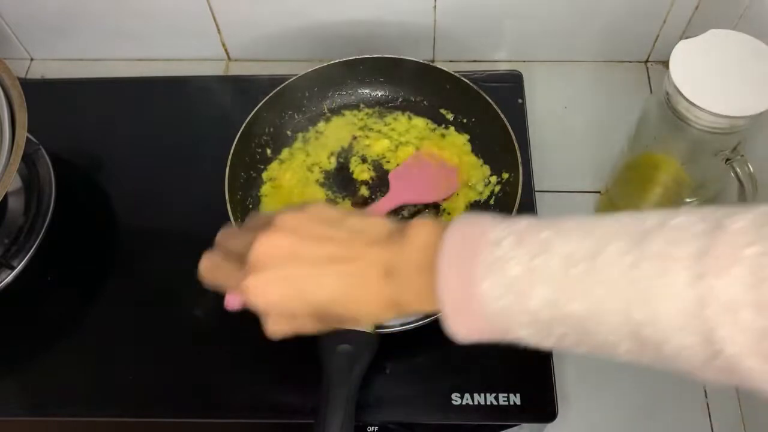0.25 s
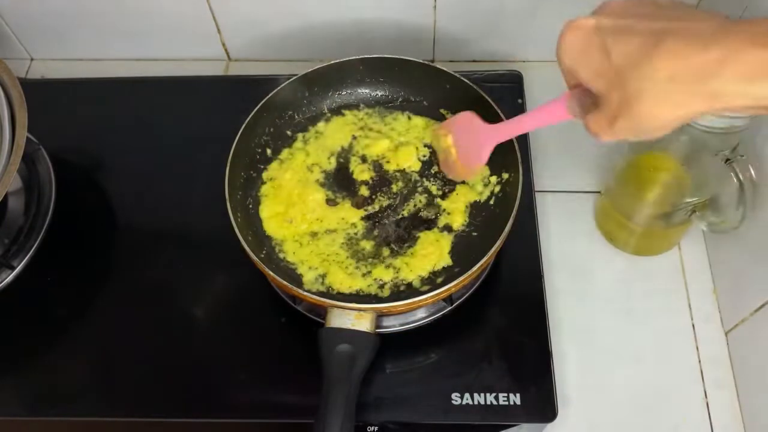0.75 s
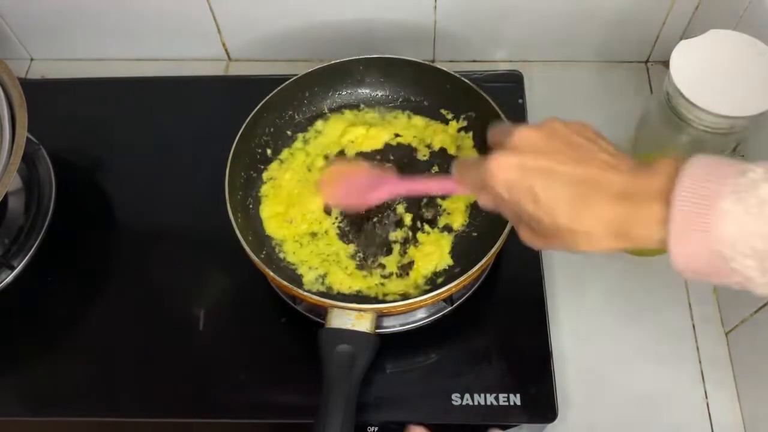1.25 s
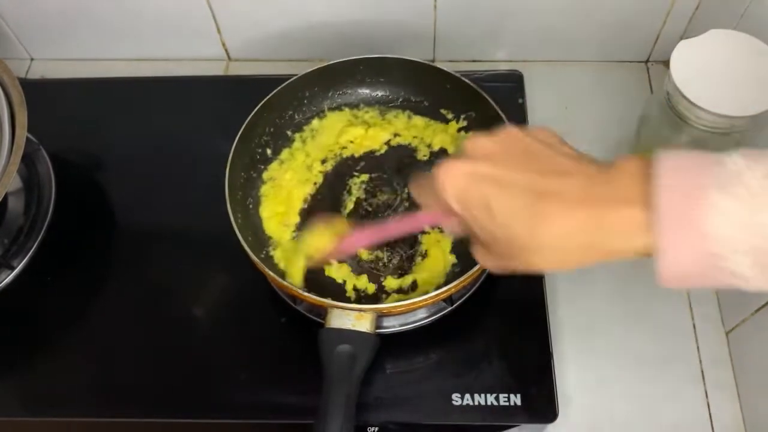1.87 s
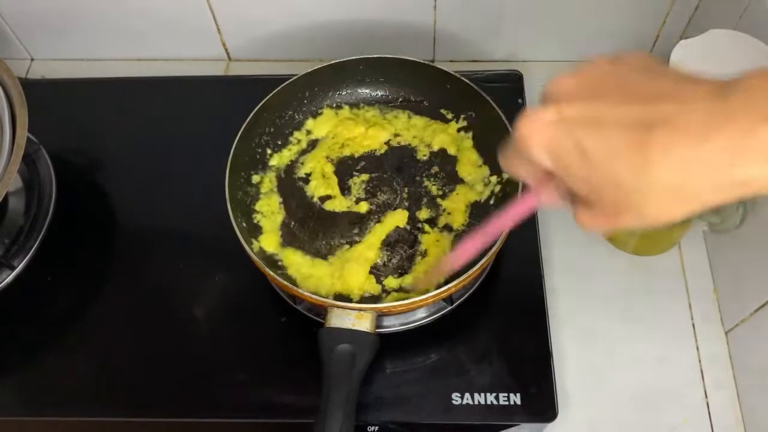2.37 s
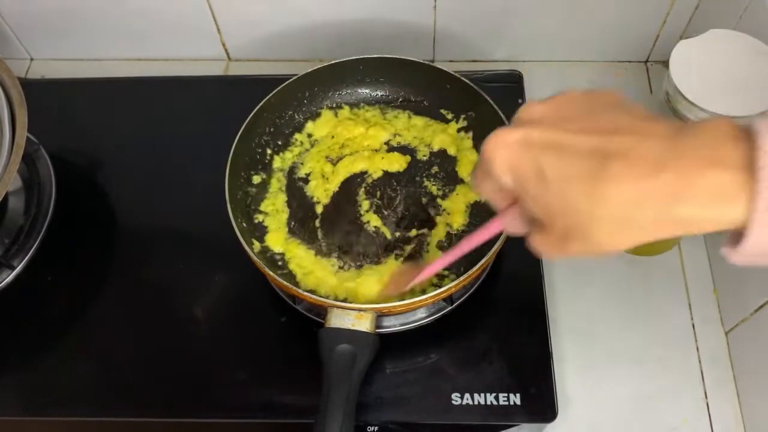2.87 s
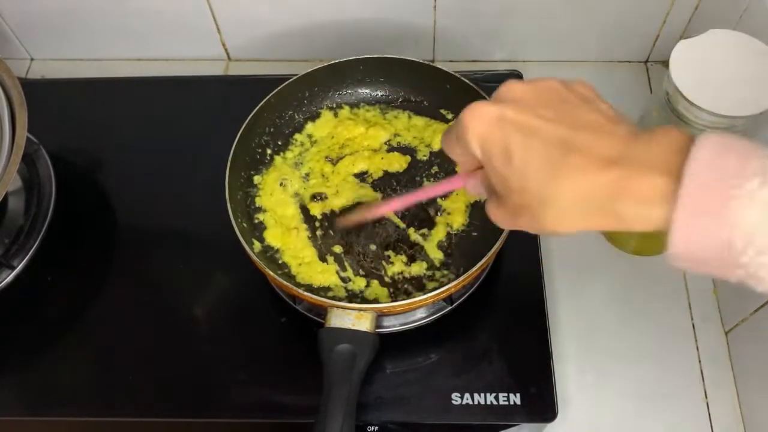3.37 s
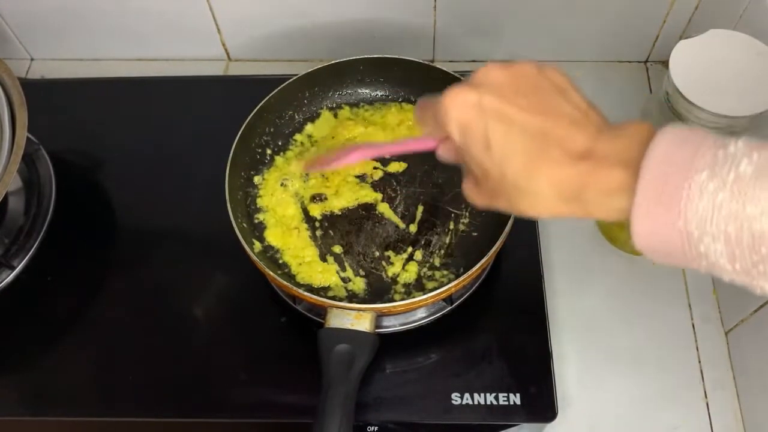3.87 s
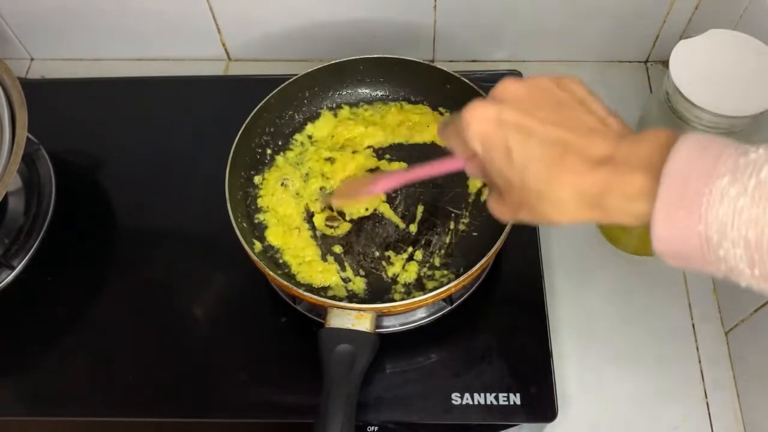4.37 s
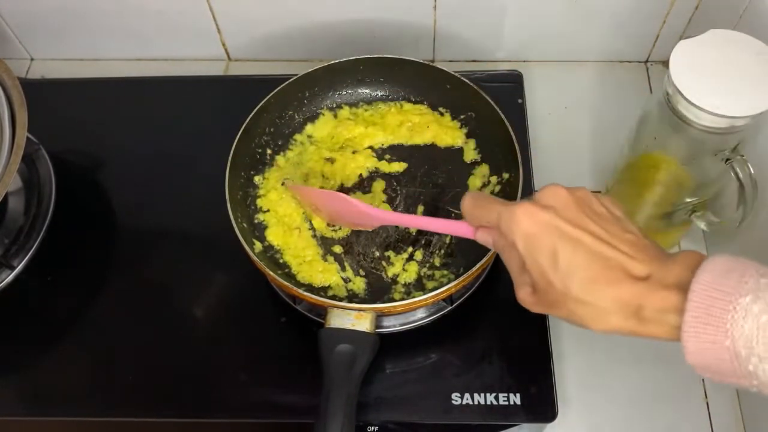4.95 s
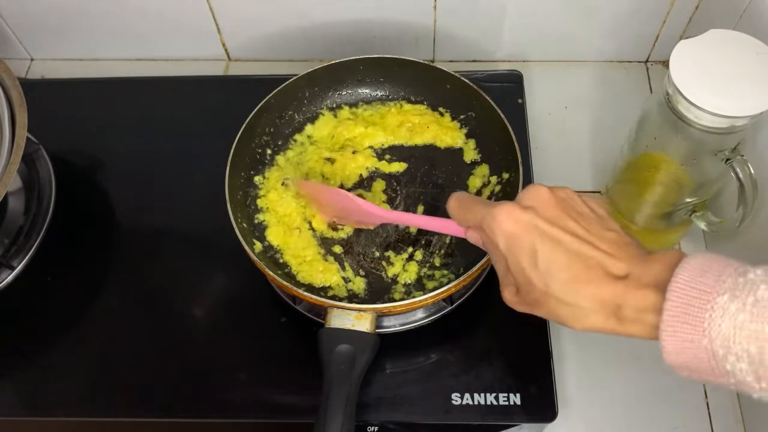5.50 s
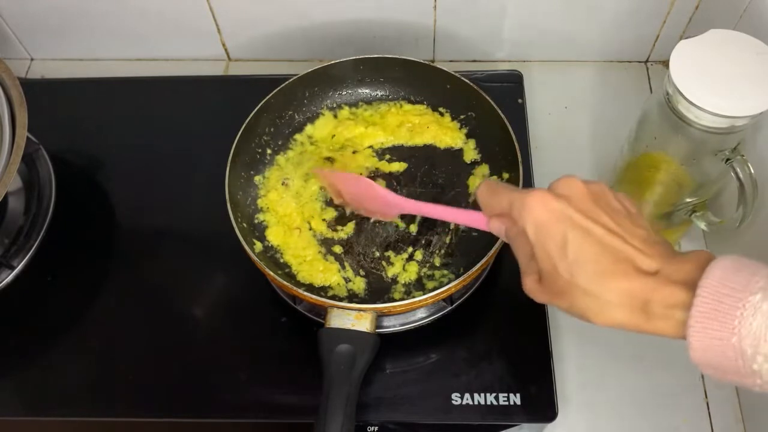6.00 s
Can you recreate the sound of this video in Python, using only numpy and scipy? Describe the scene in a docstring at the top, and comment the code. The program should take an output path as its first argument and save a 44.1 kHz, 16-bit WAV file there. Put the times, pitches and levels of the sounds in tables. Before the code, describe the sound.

Close stereo microphone over a hot pan in a home kitchen: continuous hissing, fizzing fry noise, wetter and louder whenever paste is pressed against the metal. One dull knock opens, a sharper clack with quick thuds comes after two seconds, a low windy thump around three, then scattered soft thuds near the end. Tiny rubbery squeaks, faint scraping murmur, a far motor that fades and a quiet low hum sit underneath.

```python
"""Sizzling spice paste

Wet spice paste sizzles in a pan: noise and tiny bubble pings, louder where paste is pressed on hot metal.
A soft spatula makes dull knocks by ringing the pan's tones, murmurs by rubbing and hoots in short squeaks.
Air twice buffets the microphone: low noise with a moving upper edge, plus single flaps.
Behind it are a fan's wavering tones, a far motor that fades, a low drone and soft kitchen noise."""
import sys
import numpy as np
from scipy import signal
from scipy.fft import rfft, irfft
from scipy.io import wavfile
from scipy.ndimage import uniform_filter1d

SR = 44100
rng = np.random.default_rng(int(sys.argv[2]) if len(sys.argv) > 2 else 0)


def log_audio(samples):
    """Write samples as a 16-bit WAV file to the path given in sys.argv[1]."""
    # one column per channel
    frames = np.atleast_2d(samples).T
    # limit to full scale, then quantise
    limited = np.clip(frames, -1, 1)
    pcm = np.round(limited * 32767).astype(np.int16)
    wavfile.write(sys.argv[1], SR, pcm)


N = 274743
TIME = np.arange(N) / SR
BINS = np.fft.rfftfreq(N, 1 / SR)

# Frying layers: fine fizz is full above the first pitch, wet hiss between the next two,
# coarse bubbling below the last; they blend in between: f/Hz
FRYING_EDGES = [9900, 5260, 3100, 1650]
# Tone colour of the sizzle, before the pan's ringing: f/Hz, relative level/dB
SIZZLE_COLOUR = [(400, -30.5), (800, -18.5), (980, -8.5), (1200, -9.5), (1420, -4), (1850, -7.5),
                 (2500, -7), (3700, -2), (5000, -3), (6500, -0.5), (7500, -5), (8200, -1.5), (9500, .5),
                 (12000, -1), (15500, -3)]
SIZZLE_DB = -30.5
# Faint ringing of the pan under the bubbles: f/Hz, width/Hz, boost/dB
PAN_RING = [(976, 13, 6.5), (1078, 97, 3.5), (1370, 38, 3.5), (1509, 32, 4.5), (1977, 22, 2.5),
            (2075, 23, 7), (3160, 13, 7.5), (3490, 34, 5), (3820, 69, 4.5), (5630, 220, 2), (6000, 93, 1)]
# Slow level of the fine fizz: t/s, relative level/dB
FIZZ_LEVEL = [(0, -3.5), (.2, -3.5), (.42, -1.5), (.8, -1), (1.35, .3), (2.05, -2.5), (2.35, 0.5),
              (3.3, -2), (4.8, 1.17), (6.23, 1)]
# The spatula presses wet paste onto hot metal: start t/s, length/s, rise of the wet hiss/dB
PRESSES = [(0.747, 0.45, 3), (1.157, 0.082, 4.5), (1.242, 0.34, 3), (2.206, 0.34, 3.5), (2.554, 0.724, 2.5),
           (3.294, 0.95, 6.5), (4.373, 2.1, 3)]
PRESS_ATTACK_S, PRESS_RELEASE_S = 0.041, 0.044
IDLE_HISS_DB = -4.5  # the wet hiss while nothing is pressed
BUBBLING_DB, BUBBLING_SHARE = -0.34, 0.39  # coarse bubbling follows the wet hiss by this share
# Pockets of steam escape in a flare of fine fizz: t/s, rise/dB
FLARES = [(.93, 3), (1.23, 2.5), (3.13, 4), (3.98, 1.5), (6.169, 2.5)]
FLARE_RISE_S, FLARE_FALL_S = 0.038, 0.055

# Ringing tones of the loaded pan on its support: f/Hz, relative level/dB, time to fall 60 dB/s
PAN_MODES = [(123, 10, 0.18), (142, 7, 0.084), (230.5, 1, 0.13), (272, -1.5, 0.08), (292.5, 4.5, 0.089),
             (338, 0.5, 0.029), (427, -5, 0.073), (512, -7, 0.095), (567.7, 0, 0.1), (706, -9, 0.024),
             (760, -7, 0.027), (951, -1.5, 0.057), (1030, -8, 0.05), (1150, -14, 0.046), (1430, -3, 0.041),
             (1550, -5, 0.036), (2190, -3, 0.056)]
# The spatula taps the pan: t/s, peak level/dB (without room), centre f/Hz, width/octaves, ring time factor
TAPS = [(0, -27, 241, 0.038, 1.2), (.002, -37.5, 433, .11, 0.88), (2.274, -22.5, 1290, 0.48, 0.81),
        (2.275, -30.5, 410, 0.14, 0.88), (2.281, -22.5, 955, 0.14, 0.94), (2.284, -29.5, 570, 0.23, 0.86),
        (4.564, -40.5, 514, 0.26, 0.6), (4.814, -38, 538, 0.41, 0.96), (5.794, -38, 530, 0.27, .9),
        (6.066, -35, 530, .22, 0.73)]
# The pan rocks on its support with dull thuds: t/s, peak level/dB (without room), centre f/Hz
THUDS = [(2.286, -20.5, 259), (2.309, -28, 278), (2.339, -40, 250), (2.362, -29.5, 332), (2.388, -45, 330),
         (4.596, -41, 300), (4.63, -45, 280), (4.826, -26.5, 287), (4.853, -27.5, 293), (4.87, -31.5, 300),
         (5.136, -38, 288), (5.167, -29.5, 285), (5.379, -39, 316), (5.412, -32, 281), (5.806, -35, 233),
         (5.831, -23.5, 283), (5.855, -33.5, 250), (5.873, -34, 300), (5.945, -40, 258), (6.078, -36, 218),
         (6.102, -33.5, 287)]
THUD_OCTAVES, THUD_RING = 0.31, 0.98  # width of a thud's spectrum; its ring time factor
KNOCK_ROOM_DB = -12
# The spatula drags through paste: start t/s, length/s, level/dB
DRAGS = [(0, 3.57, -57.5), (2.24, 0.23, -52.5), (4.534, 1.52, -56.5)]
DRAG_ATTACK_S, DRAG_RELEASE_S = 0.031, 0.29
# The soft blade squeaks on the metal: start t/s, length/s, middle peak level/dB, middle f/Hz
SQUEAKS = [(0.829, .026, -45, 560), (1.14, .05, -50.5, 566), (1.24, .012, -50.5, 610),
           (2.482, 0.013, -40.5, 637), (3.815, 0.026, -41, 572), (5.103, 0.023, -41, 568),
           (5.798, 0.018, -40.5, 562), (6.138, .027, -44.5, 570)]
SQUEAK_ATTACK_S, SQUEAK_RELEASE_S = 0.007, 0.013

# Air blows across the microphone: t/s, rms level/dB, upper edge f/Hz
GUSTS = [(2.0, -73, 80), (2.05, -48, 89), (2.09, -36.5, 62), (2.145, -39, 110), (2.22, -37, 65.4),
         (2.26, -71, 80), (2.9, -72, 80), (2.995, -44, 131), (3.07, -39, 220), (3.09, -29, 290),
         (3.12, -22.5, 260), (3.155, -28, 208), (3.18, -22.5, 270), (3.225, -22.5, 247), (3.25, -28, 110),
         (3.275, -58, 80), (3.3, -75, 80)]
# Tone colour of the moving air, before the upper edge: f/Hz, relative level/dB
GUST_COLOUR = [(25, -45), (40, -2.5), (74, 3), (120, -5.5), (160, 0.5), (210, -10.5), (300, -16),
               (600, -18.5), (1200, -46)]
GUST_EDGE_DB_PER_OCTAVE = 27
# Single eddies flap against the microphone: t/s, level/dB (before a shared boost), centre f/Hz
EDDIES = [(2.144, -41, 230), (3.075, -32.5, 480), (3.124, -23.5, 354), (3.172, -18, 150), (3.185, -17, 268),
          (3.193, -25, 490), (3.218, -28, 385)]
EDDY_CYCLES = 0.79

# Steady tones of the fan: middle f/Hz, rms level/dB
FAN_TONES = [(53.9, -49), (107.8, -66.5)]
# The fan's hum dips briefly: t/s, depth/dB
HUM_DIPS = [(2.428, 34), (4.07, 28), (4.95, 5)]
HUM_DIP_WIDTH_S = 0.17
# A far motor drifts unevenly in pitch, then fades: t/s, f/Hz, middle rms level/dB of its main tone
MOTOR_PATH = [(0, 228.8, -57), (.35, 224, -57.5), (.55, 229, -56.5), (.9, 223.4, -59), (1.25, 216.8, -61.5),
              (1.45, 216.4, -54.5), (1.62, 212.5, -56.5), (1.85, 215.3, -55), (2.05, 213.6, -65),
              (2.7, 219.8, -63), (3.2, 219, -75)]
MOTOR_HALF_DB = -9.5  # its tone an octave below, against the main tone
# A lower drone comes and goes
DRONE_HZ, DRONE_DB = 179, -58.5
DRONE_START_S, DRONE_LENGTH_S, DRONE_ATTACK_S, DRONE_RELEASE_S = 0.56, 0.91, 0.83, 0.24
# Tone colour of the kitchen noise: f/Hz, relative level/dB
ROOM_COLOUR = [(20, -30), (36, -12), (50, -0.5), (72, 2.5), (86, -3.5), (105, 0.5), (150, -13.5),
               (290, -18), (390, -20), (420, -8), (450, -26), (570, -12), (660, -22), (900, -22.5)]
ROOM_DB = -48

# Phase between the microphone's two ports: f/Hz, phase/rad
PORT_PHASE = [(0, 0), (50, -.22), (180, -.65), (350, -.8), (780, -1.4), (1030, -.3), (2700, .7),
              (3790, 1.6), (4700, 3.14), (16000, 19.85)]
# Left port against right port: f/Hz, level/dB
PORT_BALANCE = [(60, .5), (200, 2.5), (560, 3), (760, 0), (1000, -6), (1400, -3), (2600, -2.6), (3900, 0),
                (15000, 0)]
# How alike the two ports hear: f/Hz, likeness (0 to 1)
PORT_LIKENESS = [(100, 1), (400, 1), (750, 0.038), (1100, 1), (2400, 0.62), (4400, 1), (15000, 1)]
RUMBLE_CUT_HZ, EDGE_HZ = 23, 15800  # lower and upper limit of the recorded band


def sizzle(pop_share, patchy_db, sputter_db):
    """Near bubbles pop over a wash of countless others, in clumps that rise and fall with the frying."""
    share = np.clip(pop_share, 0, 1)
    pops = bubbles(per_s=5000, spread_db=1.0, cycles=1.34)
    near = np.sqrt(share) * pops + np.sqrt(1 - share) * rng.standard_normal(N)
    # row 0 is the direct sound, row 1 the diffuse sound
    pair = coloured(np.array([near, rng.standard_normal(N)]), SIZZLE_COLOUR)
    ring_db = sum(boost / (1 + (2 * (BINS - centre) / width) ** 2) for centre, width, boost in PAN_RING)
    pair = irfft(rfft(pair) * gain_of(ring_db), N)

    # shape the level in small tiles of time and pitch
    hz, t, tiles = signal.stft(pair, SR, nperseg=256, noverlap=192)
    layer_shapes = np.eye(3)[:, [0, 1, 1, 2]]  # fizz, hiss, bubbling at the four edges
    pitch, edges = -np.log(hz + 1), -np.log(FRYING_EDGES)
    reach = np.array([np.interp(pitch, edges, shape) for shape in layer_shapes])
    clumps = uniform_filter1d(rng.standard_normal(tiles.shape[1:]), size=12, axis=0)
    clumps = evened(uniform_filter1d(clumps, size=14, axis=1))
    tiles = tiles * gain_of(reach.T @ frying_levels(t) + patchy_db * clumps)
    pair = signal.istft(tiles, SR, nperseg=256, noverlap=192)[1][:, :N]
    pair = pair * gain_of(sputter_db * drift(rate_hz=9.9))
    return gain_of(SIZZLE_DB) * ports(*evened(pair))


def frying_levels(t):
    """Fine fizz, wet hiss and coarse bubbling in dB: pressing raises the last two, escaping steam the first."""
    wet = IDLE_HISS_DB + sum(rise_db * held(t - s, length, PRESS_ATTACK_S, PRESS_RELEASE_S)
                             for s, length, rise_db in PRESSES)
    flares = sum(rise_db * held(t - s, FLARE_RISE_S, FLARE_RISE_S, FLARE_FALL_S) for s, rise_db in FLARES)
    fizz = np.interp(t, *np.transpose(FIZZ_LEVEL)) + flares
    return np.array([fizz, wet, BUBBLING_DB + BUBBLING_SHARE * wet])


def bubbles(per_s, spread_db, cycles, count=24):
    """Each bursting bubble is a fading ping; higher pings, from smaller bubbles, come more often."""
    out = np.zeros(N)
    t = TIME[:400]
    for hz in np.geomspace(1000, 15000, count):
        ping = np.sin(2 * np.pi * hz * t) * np.exp(-t * hz / cycles)
        share = np.sqrt(hz / SR) * 3 / count  # scales the pop rate at this pitch
        strength = gain_of(spread_db * np.minimum(rng.exponential(1, N), 5))
        pops = strength * (rng.random(N) < share * per_s / SR)
        out += np.sqrt(hz) * evened(signal.oaconvolve(pops, ping)[:N])
    return evened(out)


def knocks(rise_cycles, room_db, room_t60):
    """A soft blow rings the pan's tones near its own pitch; the spatula left in contact damps them."""
    out, t = np.zeros(N), TIME[:SR // 2]
    hz, db, t60 = np.transpose(PAN_MODES)[:, :, None]
    for s, peak_db, centre_hz, octaves, ring in blows():
        weight = gain_of(db) / (1 + (np.log2(hz / centre_hz) / octaves) ** 2)
        modes = weight * gain_of(-60 * t / (t60 * ring)) * np.sin(2 * np.pi * hz * t)
        rise = 1 - np.exp(-(t * centre_hz / rise_cycles) ** 2)  # a brighter blow rises faster
        blow = modes.sum(0) * rise
        add(out, s, gain_of(peak_db) * blow / abs(blow).max())
    direct = out + gain_of(room_db) * reverberant(out, room_t60)
    return ports(direct, reverberant(out, room_t60))


def blows():
    """Lists every blow on the pan, from taps and rocking, with the columns of TAPS."""
    return TAPS + [(s, db, hz, THUD_OCTAVES, THUD_RING) for s, db, hz in THUDS]


def rubbing(centre_hz, octaves, uneven_db):
    """Friction under the soft blade keeps the pan's middle tones murmuring."""
    hz, db, t60 = np.transpose(PAN_MODES)[:, :, None]
    weight = gain_of(db) / (1 + (np.log2(hz / centre_hz) / octaves) ** 2)
    # each tone is a resonance; a longer ring makes it narrower
    body = (weight / (1 + 1j * (BINS - hz) * t60 * np.pi / np.log(1000))).sum(0)
    murmur = evened(irfft(rfft(rng.standard_normal((2, N))) * body, N))
    force = sum(gain_of(db) * held(TIME - s, length, DRAG_ATTACK_S, DRAG_RELEASE_S)
                for s, length, db in DRAGS)
    return ports(*murmur * force * gain_of(uneven_db * drift(rate_hz=4.8)))


def squeaks(waver, uneven_db):
    """The soft blade sticks and slips near one of the pan's tones, a short hoot with wavering pitch."""
    out, t = np.zeros(N), TIME[:SR // 5]
    slips = drift(rate_hz=65)[:len(SQUEAKS) * len(t)].reshape(-1, len(t))
    for (s, length, db, hz), slip in zip(SQUEAKS, slips):
        tone = np.sin(2 * np.pi * np.cumsum(hz * (1 + waver * slip)) / SR)
        envelope = held(t, length, SQUEAK_ATTACK_S, SQUEAK_RELEASE_S)
        add(out, s, tone * gain_of(db + uneven_db * slip) * envelope)
    return ports(out, np.zeros(N))


def gusts(level_db, flap_db):
    """Turbulent air pushes on the microphone: it rumbles under a moving upper edge, and single eddies flap."""
    s, db, edge = np.transpose(GUSTS)
    edge_hz, rumble = np.interp(TIME, s, edge), np.zeros(N)
    turbulence = coloured(rng.standard_normal(N), GUST_COLOUR)
    for hz in np.geomspace(30, 1000, 8):
        band_filter = signal.butter(2, [hz / 1.3, hz * 1.3], "bandpass", fs=SR, output="sos")
        band = signal.sosfilt(band_filter, turbulence)
        octaves_above = np.maximum(np.log2(hz / edge_hz), 0)
        rumble += band * gain_of(-GUST_EDGE_DB_PER_OCTAVE * octaves_above)
    # even out the loudness, so the table alone sets it
    power = uniform_filter1d(uniform_filter1d(rumble ** 2, size=900), size=900)
    rumble /= np.sqrt(power + 1e-12)
    out = rumble * gain_of(level_db + np.interp(TIME, s, db))

    t = TIME[:SR // 20] - 1 / 40  # each flap is centred on its time
    for (at, peak_db, hz), turn in zip(EDDIES, rng.random(len(EDDIES))):
        flap = np.exp(-(t * hz / EDDY_CYCLES) ** 2) * np.sin(2 * np.pi * (hz * t + turn))
        add(out, at + t[0], gain_of(peak_db + flap_db) * flap)
    return ports(out, np.zeros(N))


def hum(waver_hz, flutter_db):
    """Turning machines give steady tones: a wavering fan, a far motor and a drone, over low kitchen noise."""
    turns = np.cumsum(1 + waver_hz / FAN_TONES[0][0] * drift(rate_hz=7.0)) / SR
    fan = sum(gain_of(db) * np.sin(2 * np.pi * hz * turns) for hz, db in FAN_TONES)
    fan *= gain_of(-sum(db * np.exp(-((TIME - s) / HUM_DIP_WIDTH_S) ** 2) for s, db in HUM_DIPS))

    s, pitch, level = np.transpose(MOTOR_PATH)
    angle = 2 * np.pi * np.cumsum(np.interp(TIME, s, pitch)) / SR
    motor = np.sin(angle) + gain_of(MOTOR_HALF_DB) * np.sin(angle / 2)
    motor = motor * gain_of(np.interp(TIME, s, level) + flutter_db * drift(rate_hz=8.8))

    drone = gain_of(DRONE_DB) * np.sin(2 * np.pi * DRONE_HZ * TIME)
    drone = drone * held(TIME - DRONE_START_S, DRONE_LENGTH_S, DRONE_ATTACK_S, DRONE_RELEASE_S)
    air = gain_of(ROOM_DB) * coloured(rng.standard_normal((2, N)), ROOM_COLOUR)
    tones = np.sqrt(2) * (fan + motor + drone)  # turns rms levels into sine peaks
    return ports(tones + air[0], air[1])


def reverberant(x, t60):
    """Tiled walls return the sound as a short dense tail."""
    t = TIME[:SR // 2]
    tail = rng.standard_normal(len(t)) * gain_of(-60 * t / t60) * (t > 0.004)
    return signal.fftconvolve(x, tail / np.linalg.norm(tail))[:N]


def ports(direct, diffuse):
    """Two microphone ports hear direct sound with a phase shift between them, diffuse sound in opposition."""
    same = np.clip(read(PORT_LIKENESS, BINS), 0, 1)
    shared = rfft(direct) * np.sqrt((1 + same) / 2)
    opposed = rfft(diffuse) * np.sqrt((1 - same) / 2)
    turn = np.exp(0.5j * np.interp(BINS, *np.transpose(PORT_PHASE)))
    lean = gain_of(read(PORT_BALANCE, BINS) / 2)
    left, right = (shared + opposed) * turn * lean, (shared - opposed) / turn / lean
    return irfft(np.array([left, right]), N)


def held(t, length, attack_s, release_s):
    """An envelope from t = 0: smooth attack, hold, and smooth release after the given length."""
    rise, fall = np.clip(t / attack_s, 0, 1), np.clip((t - length) / release_s, 0, 1)
    return (np.sin(np.pi / 2 * rise) * np.cos(np.pi / 2 * fall)) ** 2


def drift(rate_hz):
    """Slow random wandering of rms 1, mostly below the given rate."""
    return evened(irfft(rfft(rng.standard_normal(N)) / (1 + (BINS / rate_hz) ** 4), N))


def coloured(x, spectrum):
    """Filters x by a table of levels over pitch, at rms 1."""
    return evened(irfft(rfft(x) * gain_of(read(spectrum, BINS)), N))


def read(points, hz):
    """Reads a table on a log-frequency axis."""
    f, value = np.transpose(points)
    return np.interp(np.log(hz + 1), np.log(f + 1), value)


def evened(x):
    """Scales to rms 1."""
    return x / np.sqrt(np.mean(x ** 2) + 1e-20)


def gain_of(db):
    """Decibels to amplitude."""
    return 10 ** (np.asarray(db) / 20)


def add(mix, s, sound):
    """Mixes a sound in at time s."""
    part = mix[max(round(s * SR), 0):][:len(sound)]
    part += sound[:len(part)]


def scene():
    """Adds up the pan, the spatula, the moving air and the kitchen."""
    frying = sizzle(pop_share=0.17, patchy_db=1.15, sputter_db=0.5)
    spatula = knocks(rise_cycles=0.91, room_db=KNOCK_ROOM_DB, room_t60=0.36)
    spatula = spatula + rubbing(centre_hz=530, octaves=0.83, uneven_db=4.5)
    spatula = spatula + squeaks(waver=0.012, uneven_db=0.2)
    moving_air = gusts(level_db=0.0, flap_db=0.7)
    kitchen = hum(waver_hz=0.46, flutter_db=1.5)
    return frying + spatula + moving_air + kitchen


def record(dry):
    """The recorder cuts the deepest rumble and the highest treble."""
    cut = irfft(rfft(dry) * (1 - 1 / (1 + (BINS / RUMBLE_CUT_HZ) ** 10)), N)
    treble_limit = signal.firwin(511, EDGE_HZ, window=("kaiser", 9), fs=SR)
    return signal.oaconvolve(cut, treble_limit[None], "same")


dry = scene()
out = record(dry)
log_audio(out)
```